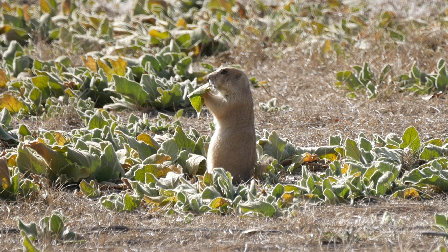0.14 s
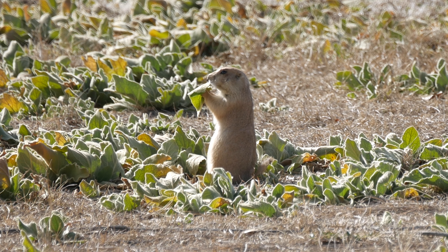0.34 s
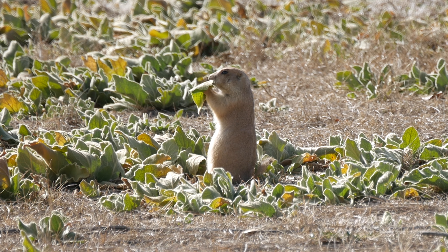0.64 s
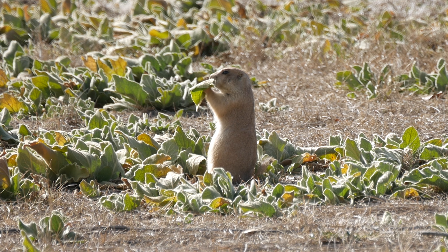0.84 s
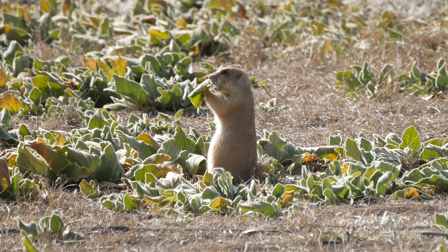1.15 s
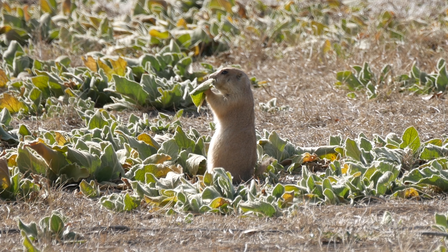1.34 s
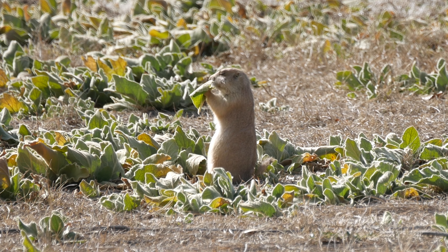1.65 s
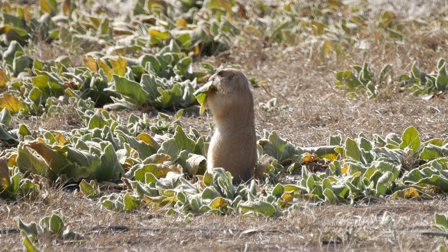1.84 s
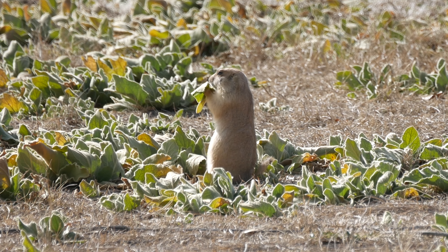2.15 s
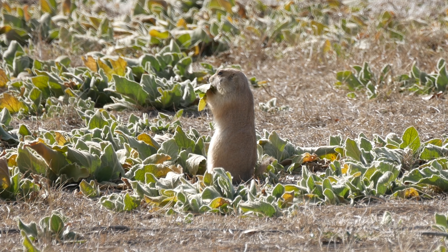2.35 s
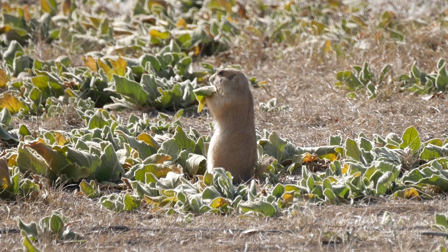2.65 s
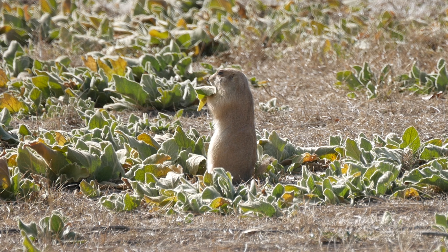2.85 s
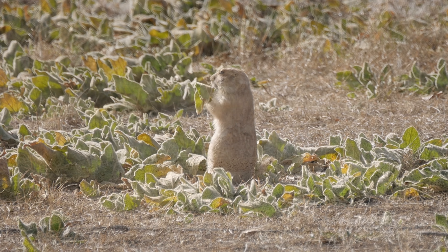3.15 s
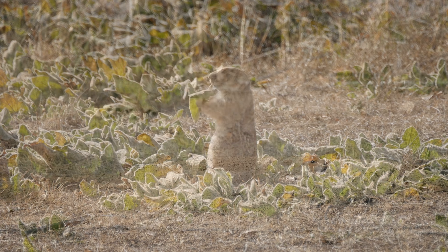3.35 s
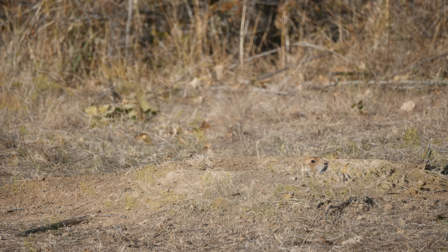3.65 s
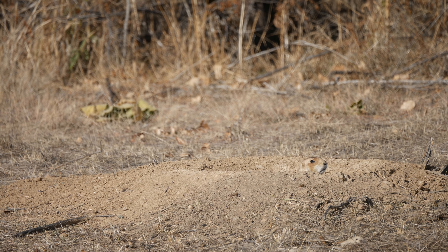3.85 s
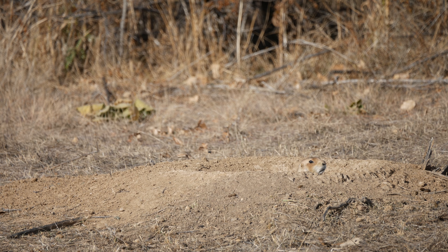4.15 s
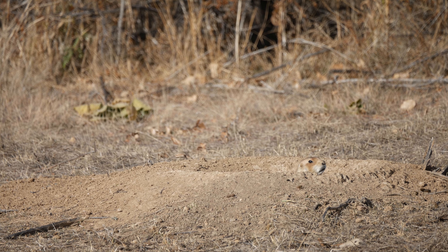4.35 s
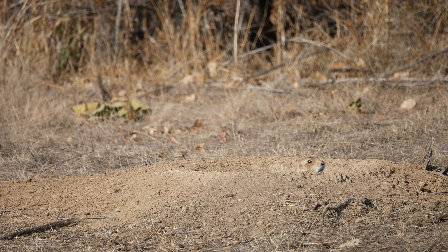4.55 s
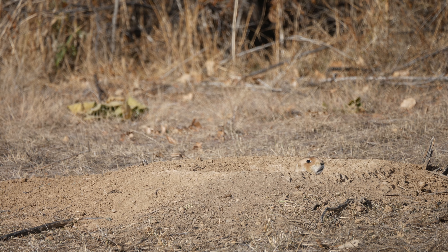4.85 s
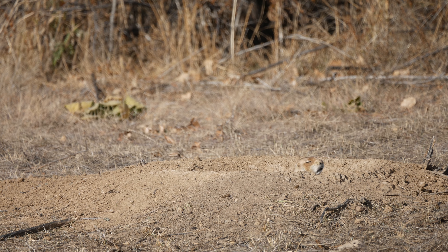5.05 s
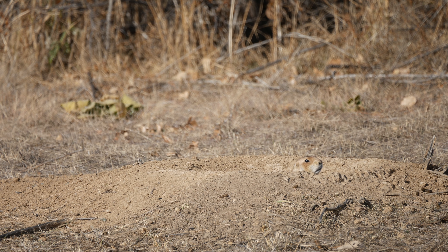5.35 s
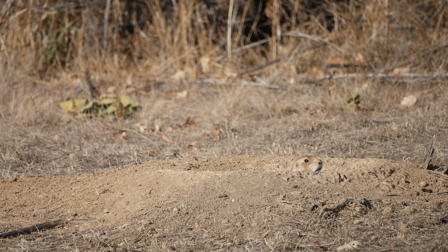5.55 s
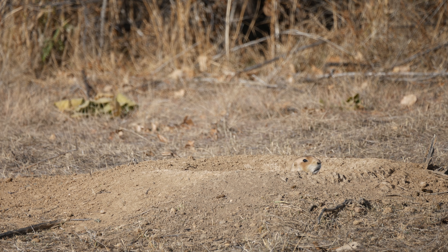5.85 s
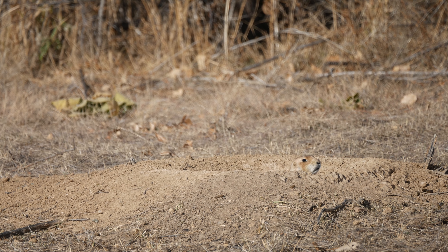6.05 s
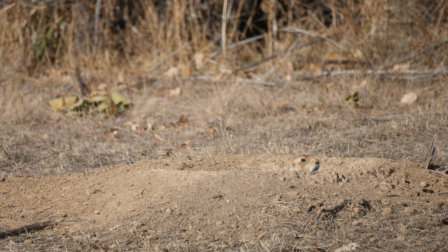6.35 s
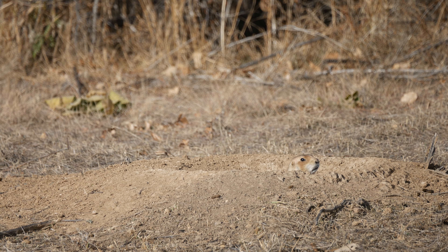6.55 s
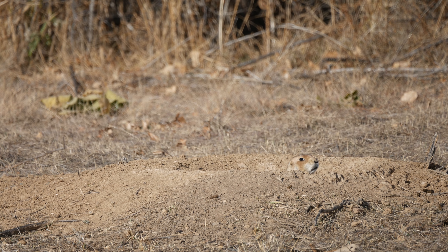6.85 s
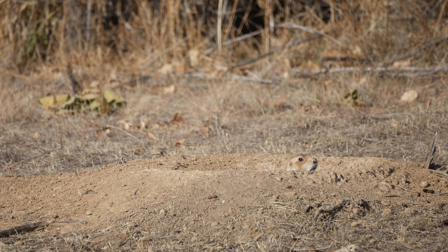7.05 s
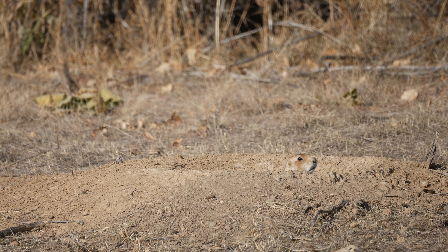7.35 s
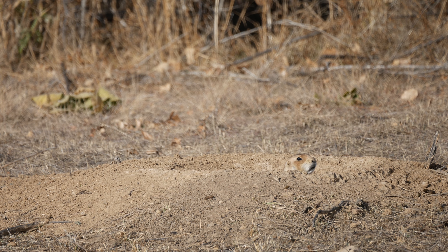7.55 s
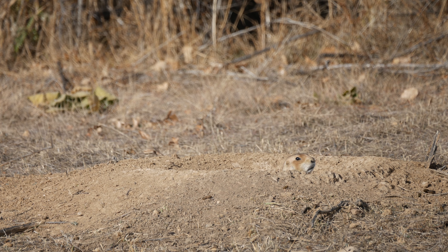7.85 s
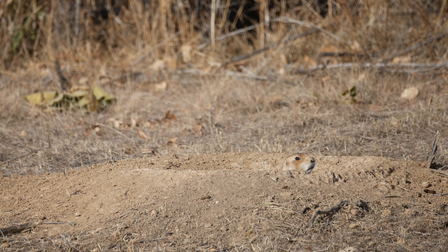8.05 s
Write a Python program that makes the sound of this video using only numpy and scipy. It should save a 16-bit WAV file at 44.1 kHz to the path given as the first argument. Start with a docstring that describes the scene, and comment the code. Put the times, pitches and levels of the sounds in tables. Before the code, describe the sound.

High, short prairie dog alarm barks, first far and soft with one bird squawk, then close and sharp amid rushing, thumping wind.

```python
"""Prairie dogs bark in open grassland, in two scenes parted by a short silence; dry stalks tick in both.
First a far animal barks over a distant engine hum, and a magpie-like bird squawks once.
Then a near one barks, harsh at first and clearer as it calms, squeaking as it draws air. Wind rushes
and buffets the microphone, grass hisses, and one whistle sounds late on.
Calls are harmonic stacks shaken by roughness; air, wind, grass and ticks are coloured noise."""
import sys
import numpy as np
from scipy import signal
from scipy.fft import rfft, irfft, next_fast_len
from scipy.io import wavfile
from scipy.ndimage import uniform_filter1d, map_coordinates

SR = 44100
rng = np.random.default_rng(int(sys.argv[2]) if len(sys.argv) > 2 else 0)


def persist_wave(psi):
    """Save psi, clipped to +-1, as 16-bit WAV."""
    counts = np.round(np.clip(psi, -1, 1) * 32767).astype(np.int16)
    wavfile.write(sys.argv[1], SR, np.atleast_2d(counts).T)


N = 362061
TIME = np.arange(N) / SR

# near animal's barks: start_s, length_s, full_tension_pitch_hz, level_db, roughness (0-1)
NEAR_BARKS = [(3.18, 0.065, 1720, -30.5, .75), (3.653, .071, 1614, -33.5, 0.99),
              (4.018, 0.073, 1614, -32, 0.73), (4.442, 0.069, 1678, -31, 0.39),
              (4.826, 0.064, 1600, -31, 0.08), (5.178, .055, 1532, -32.5, 0.09),
              (5.548, 0.061, 1487, -35, 0.05), (6.201, 0.063, 1513, -35.5, 0),
              (6.54, 0.057, 1543, -34, 0.06), (6.921, 0.067, 1454, -37, 0), (7.322, 0.066, 1461, -37, 0.01),
              (7.692, 0.058, 1443, -36.5, 0.05), (8.04, 0.055, 1457, -35.5, 0.11)]


def undb(db):
    """Decibels to gain."""
    return 10 ** (np.asarray(db) / 20)


def unit(x):
    """Scale to rms 1."""
    return x / np.sqrt(np.mean(x ** 2) + 1e-20)


def curve(rows):
    """Join (time_s, value) rows by straight lines."""
    return np.interp(TIME, *np.transpose(rows))


def colour(x, points):
    """Filter by a (freq_hz, gain_db) spectrum, straight in dB over log frequency."""
    hz, db = np.transpose(points)
    size = next_fast_len(len(x) + 512)
    f = np.maximum(np.arange(size // 2 + 1) * SR / size, 1)
    gain = undb(np.interp(np.log(f), np.log(hz), db))
    return irfft(rfft(x, size) * gain, size)[:len(x)]


def noise(points, size=N):
    """Coloured noise of rms 1."""
    return unit(colour(rng.standard_normal(size), points))


def walk(rate_hz, size=N):
    """Random wandering about 0: normal knots at rate_hz joined by straight lines, spread near 1."""
    knots = rng.standard_normal(2048)
    return np.interp(np.arange(size) * rate_hz / SR, np.arange(len(knots)), knots)


def add(track, start_s, sound):
    """Mix a sound in at start_s."""
    part = track[int(start_s * SR):][:len(sound)]
    part += sound[:len(part)]


def edges(size, ramp_s):
    """Linear fade in and out."""
    t = np.arange(size) / SR
    return np.clip(np.minimum(t, t[-1] - t) / ramp_s, 0, 1)


def swell(mid_s, half_s, order):
    """A smooth rise and fall around mid_s; a higher order gives a flatter top."""
    return np.exp(-np.abs((TIME - mid_s) / half_s) ** order)


def field(x, scatter_db, hold_s, t60_s, thicket_db, thicket_s):
    """Mounds and plants scatter the sound for a moment; a far thicket returns a faint, dull echo."""
    t = TIME[:SR // 2]
    decay = undb(-60 * np.maximum(t - hold_s, 0) / t60_s)
    scatter = unit(rng.standard_normal(len(t)) * np.clip(t / 0.021, 0, 1) * decay)
    scatter = colour(scatter, [(3000, 1.5), (7000, -4.5), (14000, -1.5)])
    thicket_spread = np.exp(-np.abs(t - thicket_s) / 0.053)
    thicket = unit(noise([(3000, -0.5), (8000, -15.5)], len(t)) * thicket_spread)
    response = (undb(scatter_db) * scatter + undb(thicket_db) * thicket) / np.sqrt(len(t))
    return x + signal.fftconvolve(x, response)[:N]


def voice(hz, rough, throat, jitter, shimmer, flutter_hz, doubling, count=11):
    """A harmonic stack through a throat; roughness shakes its phase (jitter) and size (shimmer)."""
    size = len(hz)
    wavering_hz = hz * (1 + 0.0078 * walk(400, size))
    phase = 2 * np.pi * np.cumsum(wavering_hz) / SR
    phase = phase + jitter * rough * walk(flutter_hz, size)
    k = np.arange(1, count + 1)[:, None]
    # the throat delays each harmonic differently, which spreads the pulse over its cycle
    partials = np.sin(k * phase + np.pi * k ** 2 / count)
    stack = np.sum(partials * (k * hz < .45 * SR), axis=0)
    # alternate strong and weak cycles put half lines between the harmonics
    stack = stack * (1 + doubling * np.cos(phase / 2))
    return colour(stack * (1 + shimmer * rough * walk(flutter_hz, size)), throat)


def call(rows, throat, rough, doubling, count):
    """One gliding call with a little air in it, from rows of time_s, pitch_hz, level_db."""
    s, hz, db = np.transpose(rows)
    t = np.arange(s[0], s[-1], 1 / SR)
    out = np.zeros(N)
    # a voice that breaks into half lines also stumbles in pitch, which blurs its upper partials
    stumble = 1 + .045 * doubling * walk(350, len(t))
    tone = voice(np.interp(t, s, hz) * stumble, rough, throat, jitter=0.6, shimmer=0.54,
                 flutter_hz=457, doubling=doubling, count=count)
    sound = unit(tone) + undb(-9.5) * rough * noise(throat, len(t))
    add(out, s[0], unit(sound) * undb(np.interp(t, s, db)) * edges(len(t), 0.0025))
    return out


def calm():
    """Still air as steady coloured noise, with the wavering drone of a far engine as drifting sines."""
    # still air: freq_hz, density_db (per Hz, relative)
    air_colour = [(12, -45), (20, -12.5), (70, -4), (101, -3.5), (133, -9.5), (207, -16), (252, -18),
                  (289, -16), (324, -18.5), (362, -19.5), (614, -20.5), (667, -18), (2610, -33.5),
                  (4190, -41), (15500, -44.5)]
    # engine lines: pitch_hz, mean_peak_level_db
    engine_lines = [(50.5, -67.5), (101.5, -65), (204, -73)]
    drift = 1 + 0.00493 * walk(2.76)
    drone = np.zeros(N)
    for hz, db in engine_lines:
        level = undb(db + 3.1 * walk(2.83))
        drone += level * np.sin(2 * np.pi * np.cumsum(hz * drift) / SR)
    return drone + noise(air_colour) * undb(-61.5 + 0.23 * walk(8.6))


def grass():
    """A faint, flickering hiss of dry grass that swells into rustles."""
    # rustles: mid_s, length_s, level_db
    rustles = [(3.406, 0.62, -65), (5.462, 0.12, -70.5), (6.238, 0.36, -73)]
    # grass hiss: freq_hz, density_db (per Hz, relative)
    hiss_colour = [(800, 2), (2000, -0.5), (4500, -5), (6200, -4), (6900, -7.5), (11000, -10),
                   (15000, -11.5)]
    hiss_db = -75
    rustle = sum(undb(db) * swell(s, length / 2, order=6) for s, length, db in rustles)
    return noise(hiss_colour) * np.hypot(undb(hiss_db), rustle) * undb(1.75 * walk(67))


def wind():
    """Gusts rush and moan past the microphone over a low roar and a light breeze, all coloured noise."""
    # gusts: time_s, level_db
    gust_course = [(3.2, -42), (3.76, -52), (4.24, -43), (4.58, -52), (5.07, -49.5), (5.32, -39.5),
                   (6.1, -45), (6.4, -43.5), (6.54, -48.5), (6.89, -48), (7.2, -37.5), (7.41, -37.5),
                   (7.47, -47), (7.86, -49), (7.91, -47.5), (8.2, -50.5)]
    # playback rate of the rush, which shifts its pitch: time_s, ratio
    rush_pitch = [(3.3, 1.005), (4.3, 1.1), (5.6, .95), (7.3, 1.0)]
    # low roar: time_s, level_db
    roar_course = [(3.2, -51.5), (4.51, -55), (5.65, -43.5), (6.07, -48.5), (7.38, -47.5), (7.89, -59),
                   (8.2, -53.5)]
    # wind colours, the moan one narrow resonance: freq_hz, density_db (per Hz, relative)
    rush_colour = [(150, -23), (270, -8), (350, 3), (470, 0.5), (640, -4.5), (800, -16.5), (1000, -36.5),
                   (1500, -55), (3000, -65), (9000, -86.5)]
    moan_colour = [(100, -75), (380, -40), (455, -4), (467, 16), (479, 4.5), (570, -41.5), (2500, -93)]
    edge_colour = [(700, -24.5), (1000, 4.5), (1150, 8.5), (1450, -19.5), (5000, -66.5)]
    roar_colour = [(50, -4), (100, -0.5), (160, -2.5), (230, 0.5), (310, -4.5), (450, -25.5), (1000, -48),
                   (4000, -82.5)]
    breeze_colour = [(20, -10), (90, 4.5), (200, -8.5), (500, -24), (900, -17), (1500, -30.5), (3000, -71),
                     (7000, -76.5), (15000, -61.5)]

    gust_db = curve(gust_course)
    flow = map_coordinates(noise(rush_colour), [np.cumsum(curve(rush_pitch))], mode="mirror")
    flow = flow * undb(-0.2 + 1.5 * walk(35))
    rush = (flow + undb(-10.5) * noise(moan_colour)) * undb(gust_db)
    # the strongest gusts gain a higher edge
    edge = noise(edge_colour) * undb(-67 + 1.4 * (gust_db - gust_db.max()))
    roar = noise(roar_colour) * undb(curve(roar_course) - 0.6 + 0.93 * walk(13))
    breeze = noise(breeze_colour) * undb(-54.5 + walk(6.5))
    return rush + edge + roar + breeze


def buffeting():
    """Small eddies rumble on the microphone and weaken in a lull; big ones thump it."""
    # big eddies: mid_s, level_db
    eddies = [(3.75, -31.5), (4.129, -34), (4.73, -44), (4.98, -35), (6.061, -40), (6.77, -37),
              (7.6, -38.5)]
    # rumble: freq_hz, density_db (per Hz, relative)
    rumble_colour = [(4, 1), (10, -5.5), (18, -3), (30, -15), (60, -22), (120, -27), (300, -46), (900, -99)]
    eddy_half_s = .05
    rumble_db, swing_db, swing_rate_hz = -43, 2, 10
    lull_start_s, lull_fade_s, lull_db = 6.8, 0.16, -7
    lull = np.clip((TIME - lull_start_s) / lull_fade_s, 0, 1)
    small = undb(rumble_db + swing_db * walk(swing_rate_hz) + lull_db * lull)
    big = sum(undb(db) * swell(s, eddy_half_s, order=2) for s, db in eddies)
    return noise(rumble_colour) * np.hypot(small, big)


def ticks():
    """Tiny snaps in dry stalks, as decaying noise bursts; the thicker ones knock."""
    # ticks: start_s, level_db (before decay), knock_db (gain at 1.7 kHz)
    snaps = [(0.49, -59.5, -8), (4.98, -72, 0), (6.073, -62, 20), (6.106, -61, 6)]
    # snap spectrum: freq_hz, gain_db
    snap_colour = [(600, -3), (1800, 5), (4000, -5), (9000, -11), (15000, -20)]
    out = np.zeros(N)
    t = np.arange(1024) / SR
    for s, db, knock_db in snaps:
        snap = colour(noise(snap_colour, len(t)), [(1000, 0), (1700, knock_db), (2800, 0)])
        add(out, s, undb(db) * unit(snap) * np.exp(-t / 0.0076))
    return out


def bird_squawk():
    """A magpie-like squawk: a rough harmonic glide that rises, then drops at its end."""
    # squawk: time_s, pitch_hz, level_db
    glide = [(.632, 466, -71), (.66, 530, -55.5), (.68, 568, -51.5), (.70, 615, -49.5), (.718, 640, -45),
             (.738, 728, -48), (.751, 800, -45.5), (.772, 646, -67)]
    # bird's throat: freq_hz, gain_db
    throat = [(350, -31), (720, -11.5), (1250, -1), (1900, -2.5), (2500, 3.5), (3150, -11.5), (3700, -12),
              (4900, -3), (5800, -10.5), (7200, -20), (9000, -30), (10000, -18), (12000, -46)]
    return call(glide, throat, rough=0.22, doubling=0.15, count=18)


def whistle():
    """One arched whistle: a short, breathy glide of four harmonics."""
    # whistle: time_s, pitch_hz, level_db
    glide = [(8.08, 1320, -60), (8.095, 1840, -56), (8.11, 2010, -48), (8.124, 2130, -52),
             (8.138, 1770, -54), (8.153, 1350, -78)]
    # whistle spectrum: freq_hz, gain_db
    throat = [(1300, 8), (2100, -6), (3200, -16), (8000, -34)]
    return call(glide, throat, rough=0.93, doubling=0, count=4)


def squeaks():
    """After each near bark the animal draws air in two faint, lower notes that sag in pitch."""
    # notes: delay_s (from bark start), length_s, pitch_hz (centre, at climb_mid_s), level_db (clear bark)
    notes = [(0.149, .03, 1106, -63.5), (.185, .048, 1121, -65.5)]
    # squeak spectrum: freq_hz, gain_db
    throat = [(1000, 10.5), (2200, 6.5), (3300, -2), (4500, -10), (9000, -43)]
    climb_hz_per_s, climb_mid_s = 23, 6.6  # pitch creeps up through the bout
    harsh_db = -18.5  # a fully harsh bark has a fainter squeak
    scatter_s, scatter_hz = 0.0044, 28.3
    out = np.zeros(N)
    for s, _, _, _, rough in NEAR_BARKS:
        for delay, length, hz, db in notes:
            late, sharp = rng.standard_normal(2)
            u = np.linspace(0, 1, int(length * SR))
            sag = 1 - .1 * u ** 2
            pitch_hz = hz + climb_hz_per_s * (s - climb_mid_s) + scatter_hz * sharp
            sound = voice(pitch_hz * sag, 0.48, throat, jitter=0.47, shimmer=0.89,
                          flutter_hz=800, doubling=0.077, count=7)
            sound = unit(sound * edges(len(u), 0.0052))
            add(out, s + delay + scatter_s * late, undb(db + harsh_db * rough) * sound)
    return out


def barks(rows, throat, upper_db, rasp_db, ramp_s, hoarse):
    """Each bark tenses and slackens in an arch; the folds rasp at its height and grate as they let go."""
    # one bark: share_of_length, tension (0 slack, 1 full), level_db (relative)
    shape = [(0, 0.092, -0.5), (.14, .42, 5), (.33, 0.96, 9.5), (.52, .86, 6.5), (.76, .52, 4.5),
             (0.892, .2, -3), (1, -0.56, -8.5)]
    # rasp, wider than the tone: freq_hz, gain_db
    rasp_colour = [(1200, -13.5), (2200, 2.5), (3100, -1), (4800, 8), (7000, 1.5), (14000, 4)]
    slack_hz = 1322
    out = np.zeros(N)
    share, tension, shape_db = np.transpose(shape)
    for s, length, full_hz, db, rough in rows:
        # harsh barks reach their height sooner
        u = np.linspace(0, 1, int(length * SR)) ** (1 - 0.29 * min(rough, 1))
        tense = uniform_filter1d(np.interp(u, share, tension), size=300, mode="nearest")
        strain = np.exp(-((u - .46) / .25) ** 4)
        chaos = hoarse + rough * (.13 + strain) + .25 * u ** 6
        pitch_hz = slack_hz + (full_hz - slack_hz) * tense
        tone = voice(pitch_hz, chaos, throat, jitter=0.27, shimmer=0.6,
                     flutter_hz=1508, doubling=0.032 * strain)
        rasp = chaos * colour(noise(throat, len(u)), rasp_colour)
        sound = unit(tone) + undb(rasp_db) * rasp
        # rasping costs the voice some of its power, so harsh barks have a flatter top
        course_db = np.interp(u, share, shape_db) - 4.2 * rough * strain
        sound = colour(sound, [(3500, 0), (5200, upper_db)])
        sound = sound * undb(course_db) * edges(len(u), ramp_s)
        add(out, s, undb(db) * unit(sound))
    return out


def far_animal():
    """Barks coloured as heard from far off."""
    # barks: start_s, length_s, full_tension_pitch_hz, level_db, roughness (0-1)
    far_barks = [(.038, 0.058, 1380, -54.5, 0), (.378, 0.067, 1450, -54.5, 0.63),
                 (1.0, 0.065, 1443, -56, .28), (1.433, 0.048, 1391, -55, 0.22),
                 (1.793, 0.059, 1517, -52.5, 0.33), (2.162, .0565, 1500, -53, 0.4),
                 (2.521, 0.061, 1413, -53.5, .06), (2.882, 0.068, 1494, -52, 0.3)]
    # far bark spectrum: freq_hz, gain_db
    throat = [(900, -46), (1450, -19), (2200, -7), (2800, -1.5), (3600, -4.5), (4400, -14), (5600, 1.5),
              (6950, -1), (7800, -18.5), (9800, -27), (11400, -25), (15000, -39)]
    return barks(far_barks, throat, upper_db=-4.5, rasp_db=-11, ramp_s=0.0034, hoarse=0.073)


def near_animal():
    """Barks coloured as heard close by, with the squeaks of drawn air."""
    # near bark spectrum: freq_hz, gain_db
    throat = [(800, -16.5), (1500, -23), (2300, -16), (2850, -5), (3250, 3), (3900, -10), (4700, -19.5),
              (5800, -12), (7200, -14), (7900, -28), (8700, -23), (9700, -39), (11500, -31.5),
              (15000, -53.5)]
    near_barks = barks(NEAR_BARKS, throat, upper_db=0.4, rasp_db=-3.0, ramp_s=0.0021, hoarse=0.0086)
    return near_barks + squeaks()


def scene():
    """Two scenes, both heard dead centre, with a very faint steady hiss, opposite in the two ears."""
    first_end_s, second_start_s = 2.928, 3.177
    first, second = TIME < first_end_s, TIME > second_start_s
    snaps = ticks()
    far = field(far_animal(), scatter_db=-3, hold_s=0.029, t60_s=0.17,
                thicket_db=-29, thicket_s=0.17)
    bird = field(bird_squawk(), scatter_db=-13.0, hold_s=0.017, t60_s=.22,
                 thicket_db=-34, thicket_s=0.2)
    near = field(near_animal() + whistle(), scatter_db=-15.0, hold_s=0.025, t60_s=0.17,
                 thicket_db=-45, thicket_s=.16)
    first_mix = far + bird + calm() + snaps
    second_mix = near + wind() + buffeting() + grass() + snaps
    mid = first_mix * first + second_mix * second
    side_hiss = noise([(100, 0.0), (1000, 5.0), (5000, 3.5), (15000, 0.0)])
    side = undb(-79) * side_hiss * (first | second)
    return np.array([mid + side, mid - side])


def record(dry):
    """The recorder cuts the top: a steep elliptic low-pass at 15.6 kHz."""
    return signal.sosfilt(signal.ellip(10, .2, 70, 15600, fs=SR, output="sos"), dry)


dry = scene()
out = record(dry)
persist_wave(out)
```